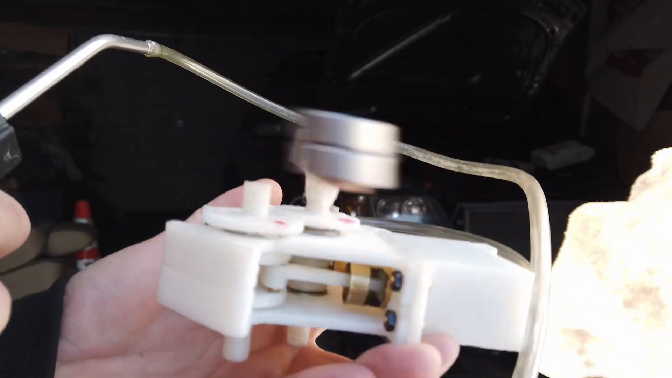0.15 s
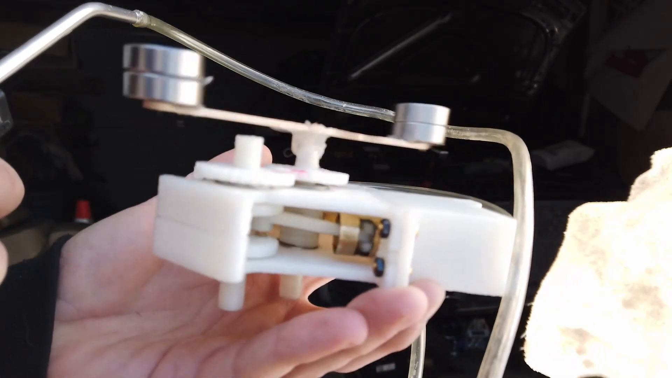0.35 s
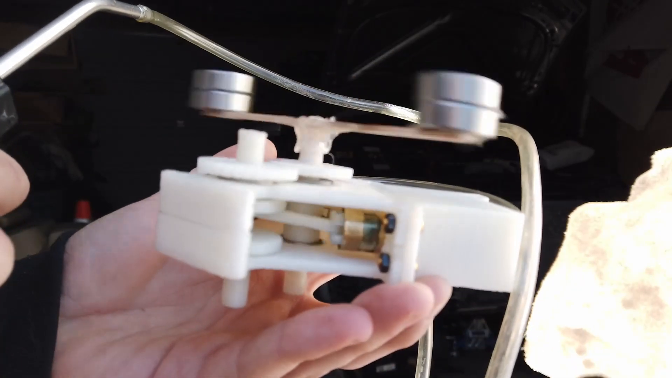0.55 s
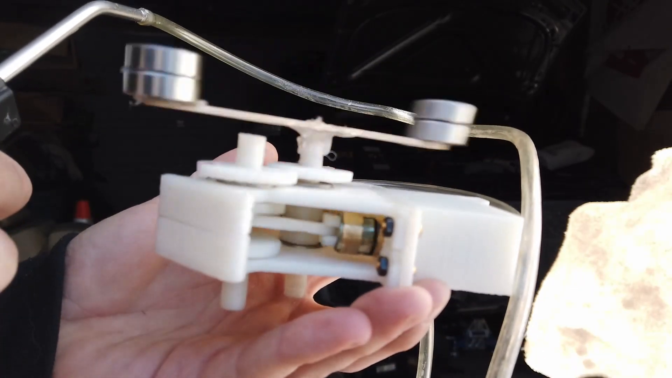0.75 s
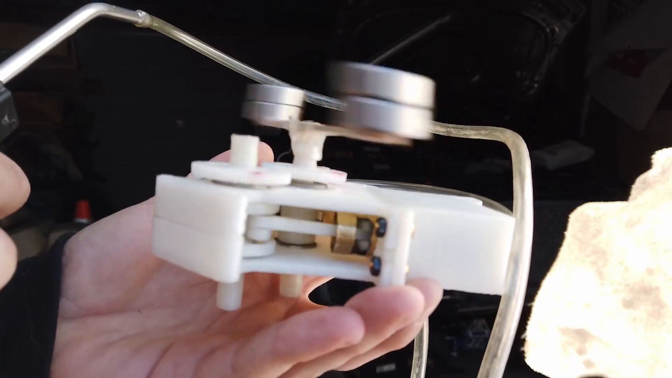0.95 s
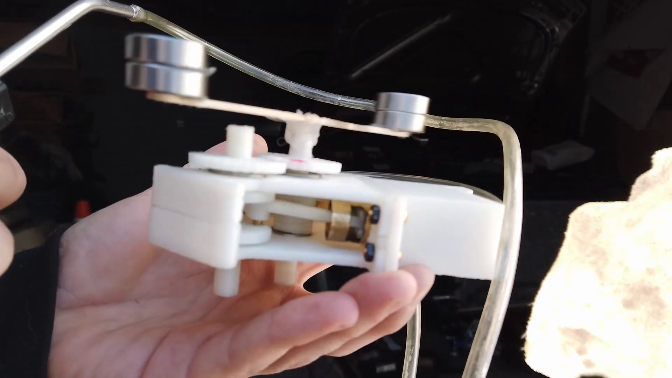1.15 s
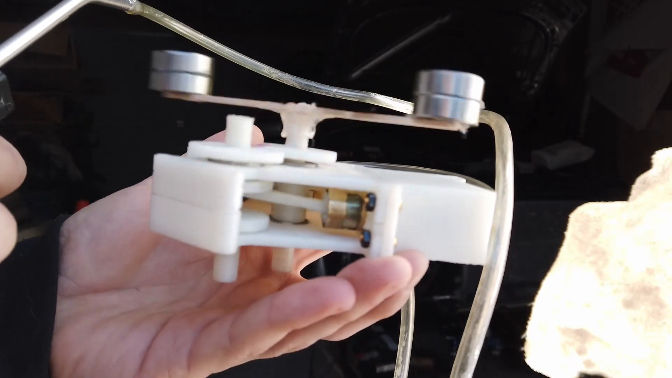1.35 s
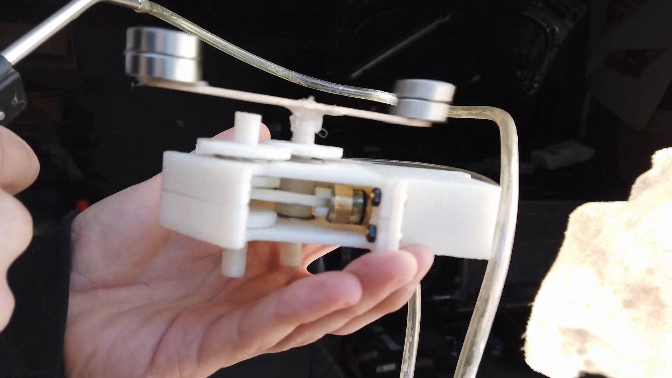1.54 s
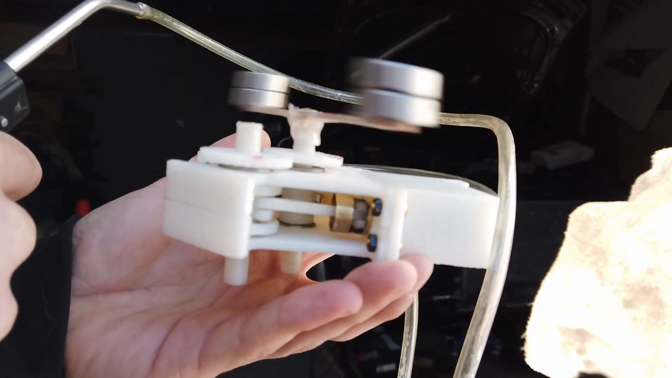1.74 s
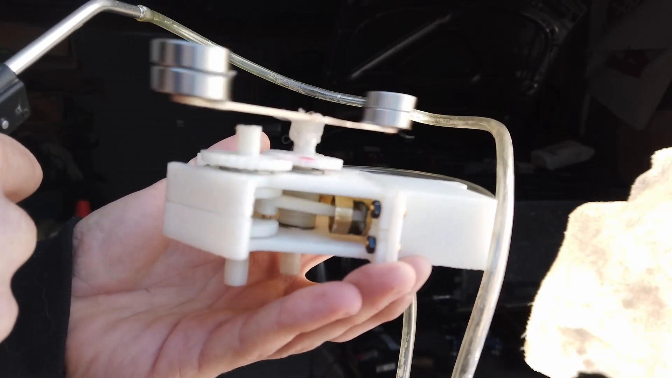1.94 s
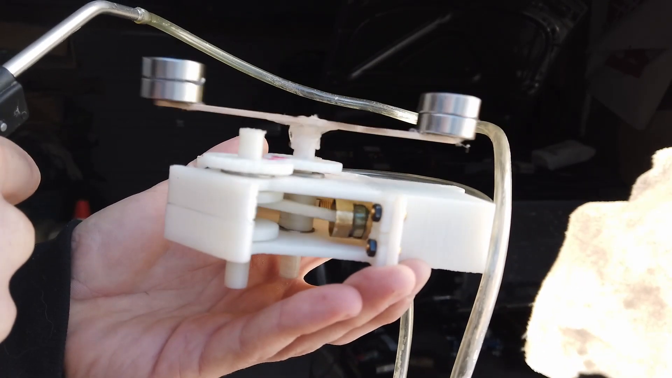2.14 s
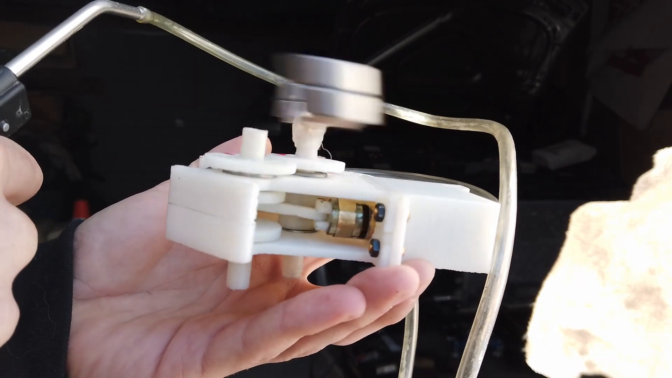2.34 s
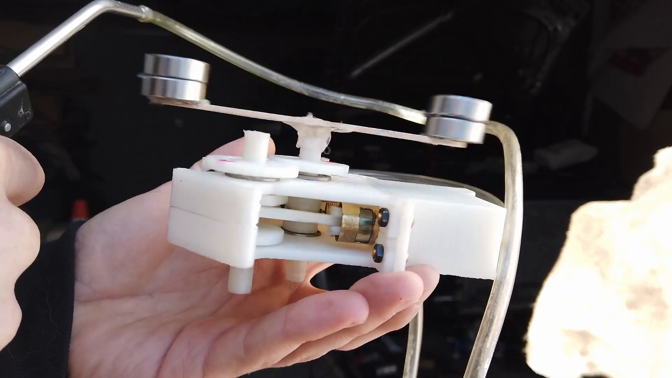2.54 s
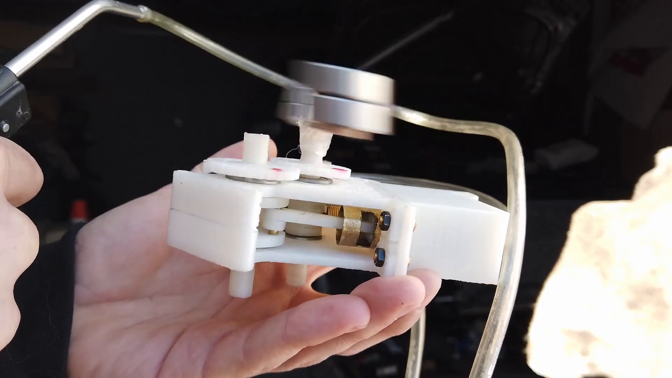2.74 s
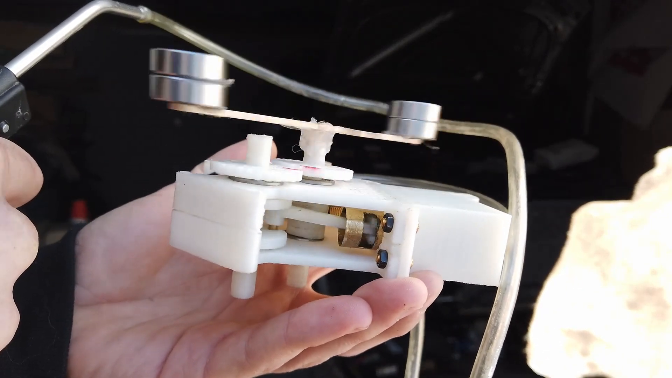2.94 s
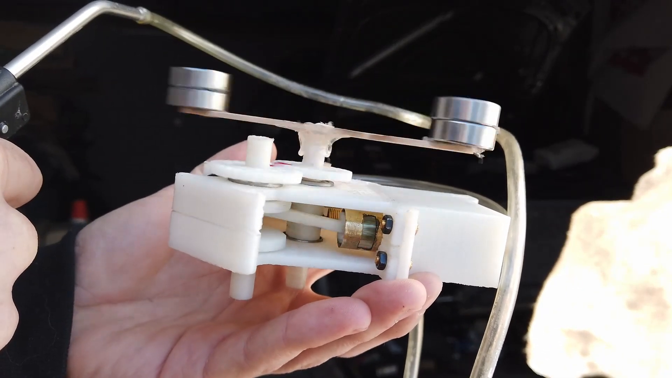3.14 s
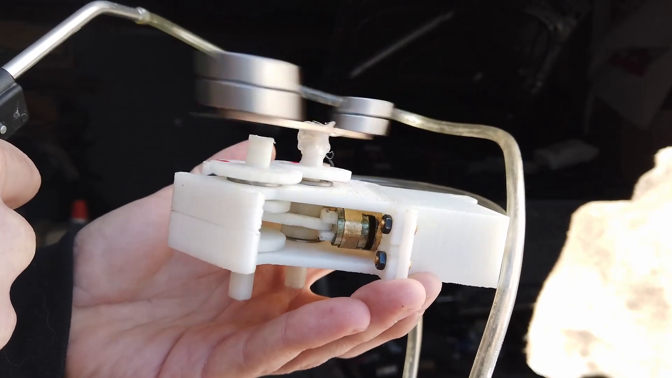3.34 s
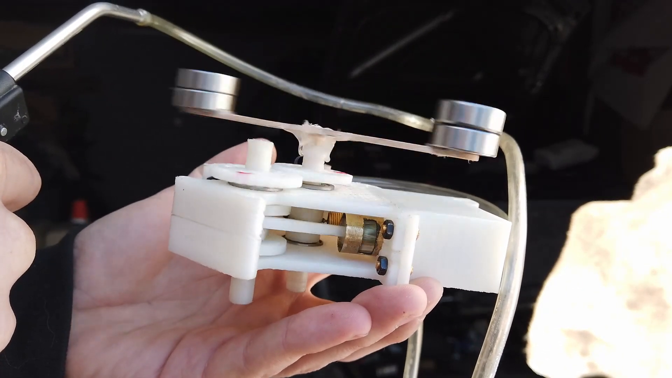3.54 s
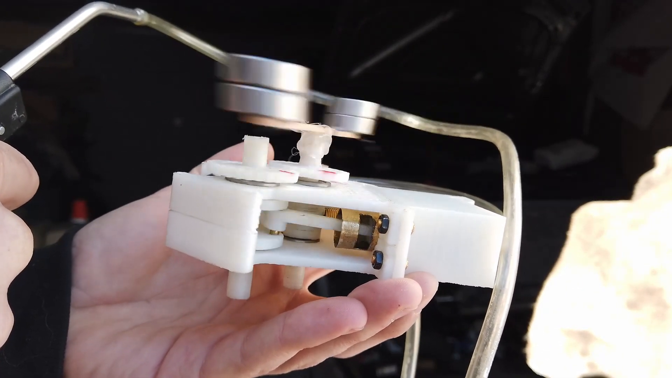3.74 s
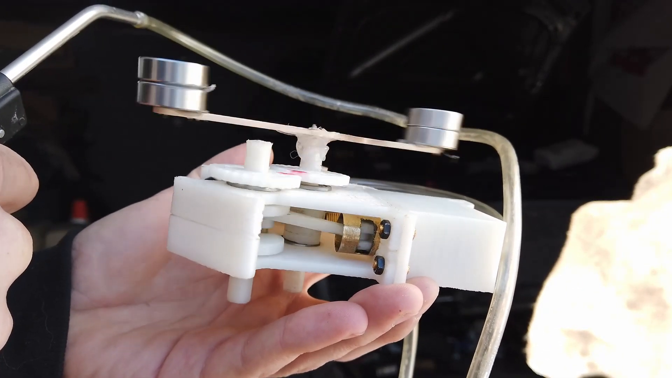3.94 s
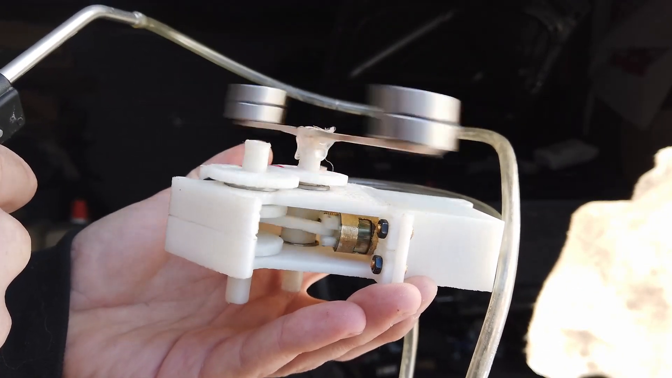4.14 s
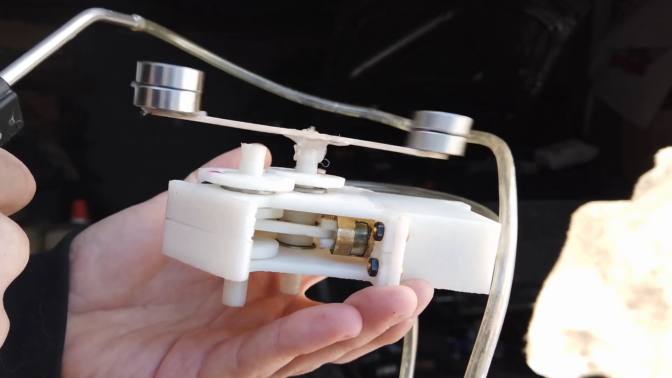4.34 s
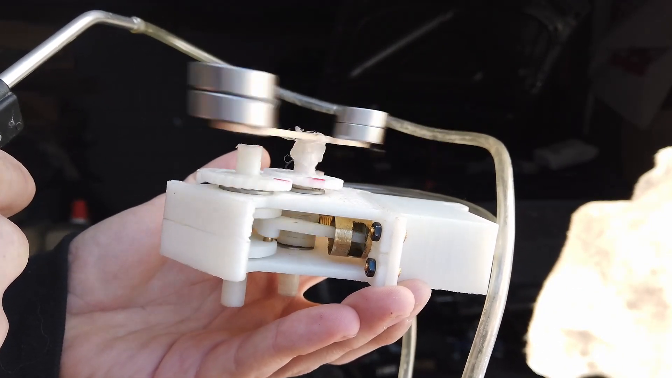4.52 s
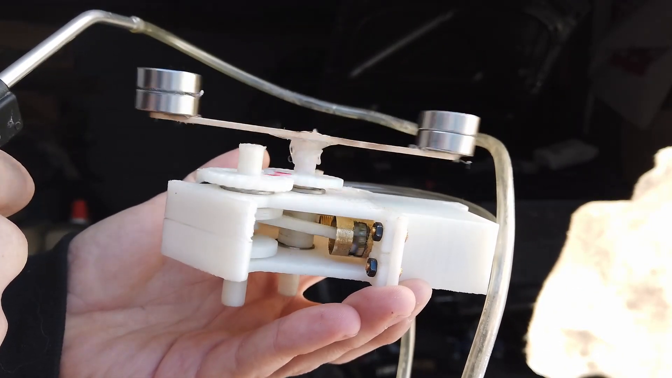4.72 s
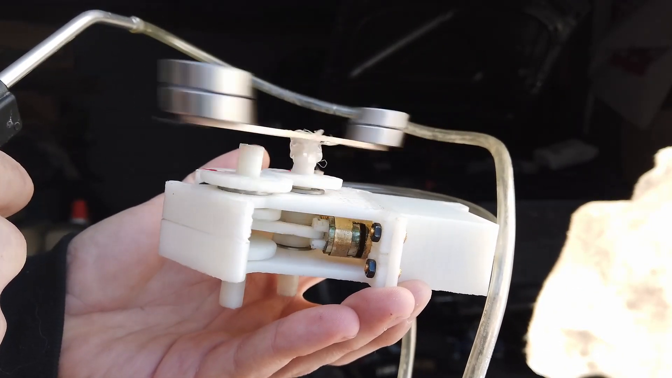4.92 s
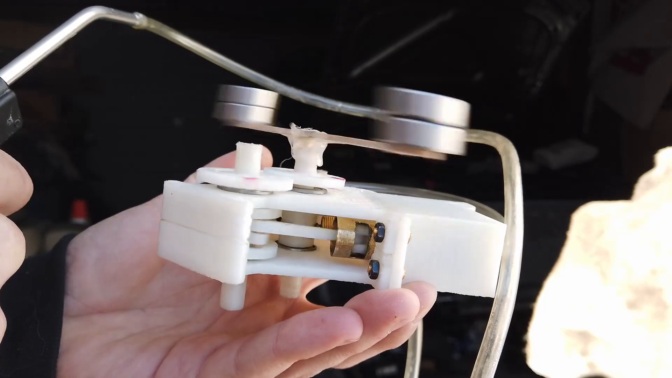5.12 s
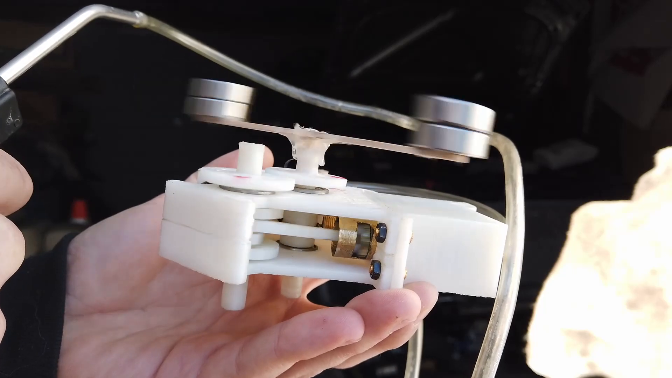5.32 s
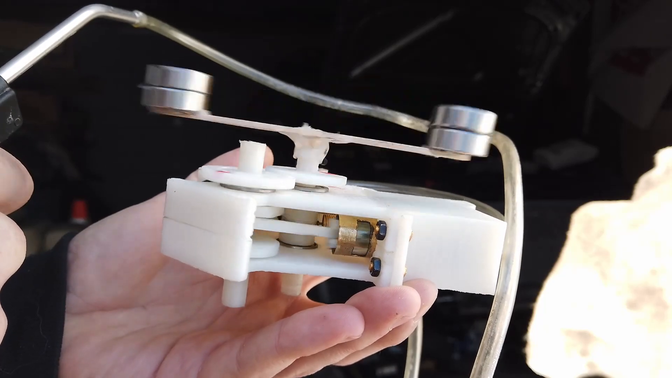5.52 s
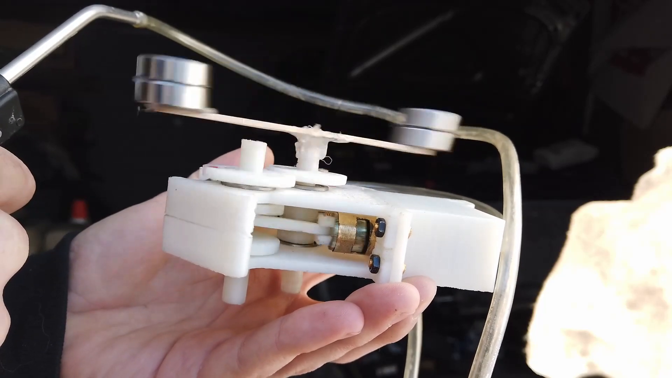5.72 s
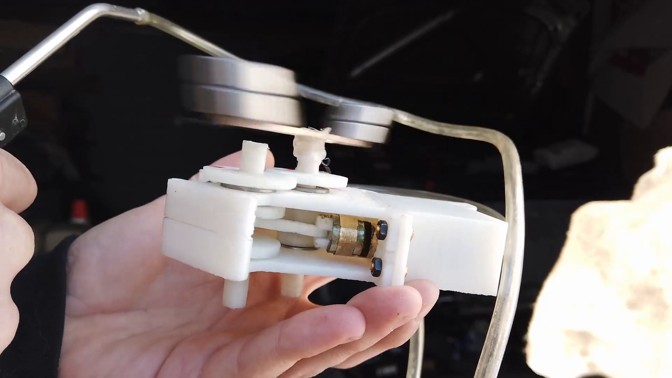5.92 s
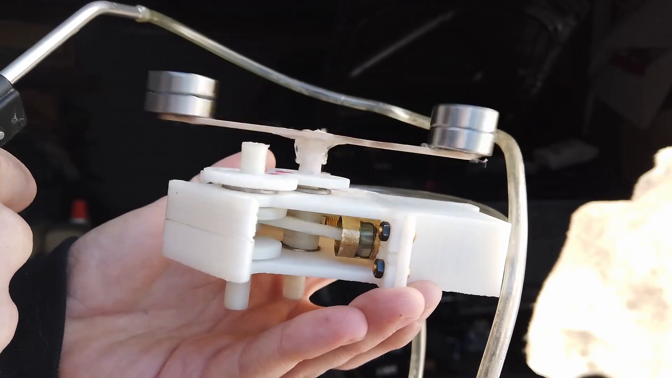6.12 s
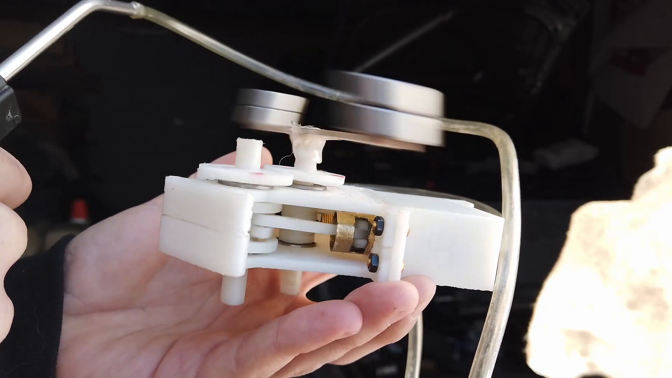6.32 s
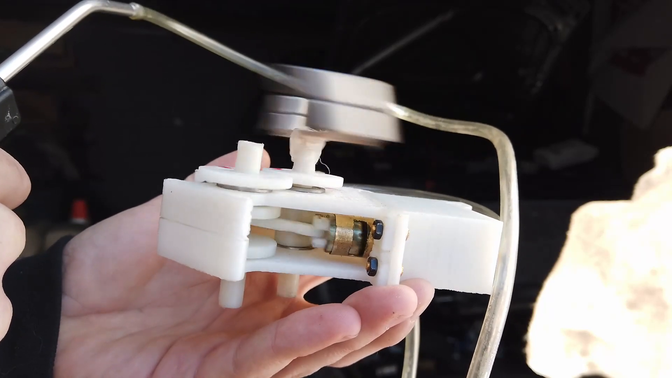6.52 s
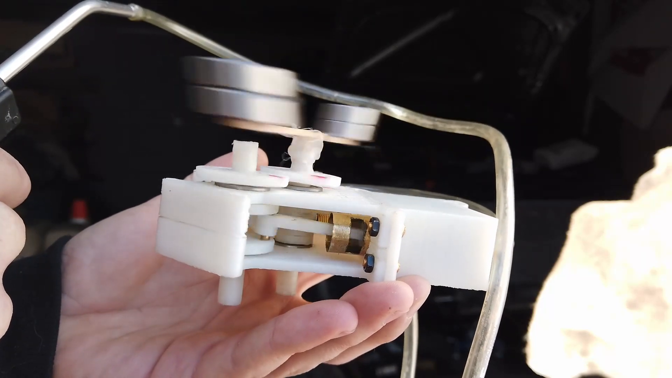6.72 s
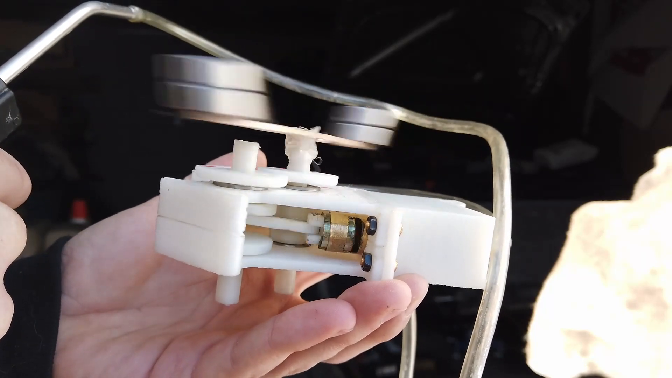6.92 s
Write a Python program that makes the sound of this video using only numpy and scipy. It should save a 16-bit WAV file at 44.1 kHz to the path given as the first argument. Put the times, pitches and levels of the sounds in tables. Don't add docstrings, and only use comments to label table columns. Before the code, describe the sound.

A small plastic air-driven engine chugs close by at about four turns a second, clacking and puffing, then speeds up with harder, hissier blasts.

```python
import sys
import numpy as np
from scipy import signal
from scipy.fft import rfft, irfft, next_fast_len
from scipy.io import wavfile
from scipy.ndimage import uniform_filter1d

SR = 44100
rng = np.random.default_rng(int(sys.argv[2]) if len(sys.argv) > 2 else 0)


def wav_record(signal):
    frames = np.transpose(np.atleast_2d(signal))
    bounded = np.clip(frames, -1, 1)
    quanta = np.round(bounded * 32767).astype(np.int16)
    wavfile.write(sys.argv[1], SR, quanta)


def invert_db(x):
    u = np.asarray(x, float) / 20
    return 10 ** u


N = 307377
time = np.arange(N) / SR
LONG = next_fast_len(N)
BINS_HZ = np.fft.rfftfreq(LONG, 1 / SR)


# time in seconds, opening from 0 to 1.
THROTTLE = [
    (0, 0.04),
    (5.12, 0.0),
    (5.2, 0.35),
    (5.85, 0.46),
    (6.0, 0.83),
    (6.97, 0.83),
]


def throttle(s):
    return np.clip(np.interp(s, *np.transpose(THROTTLE)), 0, 1)


# slap, knock and slam times in seconds, strength in dB.
IDLE_TURNS = [(-0.045, 0.0547, 0.0924, 1), (0.2143, 0.3161, 0.3527, 1.3), (0.4759, 0.5795, 0.6144, 1.2),
              (0.7399, 0.8451, 0.8807, 0.9), (1.003, 1.1055, 1.1405, 0.3), (1.2642, 1.3675, 1.4041, 0.6),
              (1.526, 1.627, 1.6625, -0.1), (1.7839, 1.8844, 1.9195, 0.1), (2.0413, 2.1411, 2.1767, -0.3),
              (2.2955, 2.393, 2.4286, -0.1), (2.5469, 2.6446, 2.6792, -0.9), (2.8002, 2.8987, 2.9337, 0.3),
              (3.0547, 3.1541, 3.1883, 0.4), (3.3103, 3.409, 3.4439, -0.2), (3.5642, 3.6618, 3.697, -0.8),
              (3.8182, 3.9178, 3.9542, 0.1), (4.0758, 4.1756, 4.2151, -0.9), (4.3356, 4.4381, 4.4727, -1.3),
              (4.6035, 4.7137, 4.7497, -1.2), (4.8841, 4.9983, 5.0351, -1.4)]
# slap, knock and slam times in seconds, strength in dB.
FAST_TURNS = [(5.1651, 5.2586, 5.2921, 0.3), (5.3855, 5.4531, 5.4811, 1), (5.5709, 5.6368, 5.6654, -0.3),
              (5.755, 5.8227, 5.8509, -0.3), (5.9425, 6.0118, 6.0341, 0.1), (6.1165, 6.1721, 6.1966, -0.1),
              (6.2714, 6.321, 6.3443, 0.1), (6.4159, 6.4661, 6.486, -0.3), (6.5573, 6.6043, 6.6269, 0.1),
              (6.6965, 6.745, 6.7652, 0.2), (6.8343, 6.8808, 6.9033, -0.2)]
NEXT_SLAP_S = 6.973
# level in dB with the air shut, level in dB wide open.
STROKE_DB = [
    (-0.2, 0.3),
    (-0.1, 0.1),
    (0.9, 7.0),
    (0.7, 1.8),
    (1.4, 3.3),
]


def strokes():
    slap, knock, slam, turn_db = np.transpose(IDLE_TURNS + FAST_TURNS)
    opening = throttle(knock)

    def blend(shut, wide_open):
        return shut + opening * (wide_open - shut)

    puff = knock - blend(31.3, 16.0) / 1000
    blast = slam - blend(8.6, 6.0) / 1000
    follows = [1, 0.4, 1, 0.4, 1]
    force_db = [blend(*pair) + share * turn_db for pair, share in zip(STROKE_DB, follows)]
    return np.transpose([slap, puff, knock, blast, slam]), np.transpose(force_db)


def unit(x):
    return x / np.sqrt(np.mean(x ** 2))


def shape(points):
    hz, db = np.transpose(points)
    return invert_db(np.interp(np.log(BINS_HZ + 1), np.log(hz), db))


def resonance(hz, width_hz, db):
    return invert_db(db) / (1 + (2 * (BINS_HZ - hz) / width_hz) ** 2) ** 1.3


def flicker(rate):
    hold = int(SR / rate)
    levels = rng.standard_normal(N // hold + 1)
    return uniform_filter1d(np.repeat(levels, hold), hold)[:N]


def train(s, size, pulse):
    spikes = np.zeros(N)
    heard = (s >= 0) & (s < time[-1])
    np.add.at(spikes, (s[heard] * SR).round().astype(int), size[heard])
    return signal.fftconvolve(spikes, pulse)[:N]


# frequency in Hz, side minus middle in dB.
SPREAD = [(25, 3), (70, -10), (150, -36), (1000, -26), (3000, -12), (7000, -6), (11000, -4), (15000, -2)]
# frequency in Hz, phase turn
LEAD = [(0, 0), (3190, 0.1), (3620, 0.3), (4910, 0.0), (5600, 1.0), (6290, 0.2), (6800, 1.4), (7240, 0.7),
        (8870, 0.3), (10100, 0.6), (11100, 2.7), (11500, 2.3), (14000, 0.9), (15300, 0.8)]


def noise(gain):
    mid, side = rfft(rng.standard_normal((2, LONG))) * gain
    side = side * shape(SPREAD)
    turn = np.exp(.36j * np.interp(BINS_HZ, *np.transpose(LEAD)))
    return unit(irfft(np.array([mid * turn + side, mid / turn - side]), LONG)[:, :N])


# frequency in Hz, time to fade by 60 dB in ms,
# then the signed share struck by slap, by knock and by slam.
BOX_MODES = [(317, 46, -.01, -.085, -.41), (440, 22, 0, -.02, -.13), (640, 11, -.1, -.02, -.17),
             (1017, 35, .05, -.02, .55), (1353, 14, -.08, .02, -2.37), (1404, 17, .14, .02, .99),
             (1571, 6, -1.3, -.48, 1.52), (1836, 10, .88, .33, -.61), (2662, 25, .1, .04, .09)]
# ms after the blow starts, signed strength.
REBOUNDS = [
    [(1.13, 1.0), (1.8, -0.19), (3.54, 0.73)],
    [(0.94, 1.0), (2.26, 3.12), (2.64, -3.34)],
    [(0.8, 1.0), (2.78, 0.42), (2.92, -0.5)],
]


def blows():
    t = time[:SR // 5]
    hz, t60_ms, *shares = np.transpose(BOX_MODES)
    decay = np.exp(-np.log(1000) * 1000 * t / t60_ms[:, None])
    rings = decay * np.sin(2 * np.pi * hz[:, None] * t)
    contact = np.hanning(14) / 6.5
    hefts = (0.0, 0.7, -0.1)
    times, force_db = strokes()
    out = 0
    for column, share, rebounds, heft in zip((0, 2, 4), shares, REBOUNDS, hefts):
        s, size = times[:, column], invert_db(force_db[:, column])
        ring = share @ rings
        stray = (share * rng.standard_normal(len(hz))) @ rings
        scatter = .07 * rng.standard_normal(len(s))
        deep = (share * (hz < 1100)) @ rings
        deep_size = size * heft * np.sqrt(throttle(s))
        for ms, strength in rebounds:
            hit = s + ms / 1000
            blow = train(hit, size, ring) + train(hit, size * scatter, stray) + train(hit, deep_size, deep)
            out = out + strength * blow
    return np.convolve(out, contact)[:N]


# frequency in Hz, level in dB.
CRACK = [(400, -11), (900, -23), (2000, 7.5), (5000, -5.5), (7000, 1.5), (8500, -0.5), (10200, 7),
         (12000, -5.5), (15600, -12), (15900, -60)]


def cracks():
    t = time[:SR // 20]
    s, force_db = strokes()
    slap_fade = np.exp(-(t / 0.0037) ** 2) + .06 * np.exp(-t / 0.01)
    slap = train(s[:, 0] + .0013, invert_db(force_db[:, 0] - 8.0), slap_fade)
    knock = train(s[:, 2] + 0.0029, invert_db(force_db[:, 2] - 25), np.exp(-(t / 0.0022) ** 2))
    slam = train(s[:, 4] + .002, invert_db(force_db[:, 4] - 10.5), np.exp(-t / 0.0012))
    return (slap + knock + slam) * noise(shape(CRACK))


# fully open from stage, until stage, attack in dB per stage, release in dB per stage.
PORTS = [
    (0.09, 0.14, 300, 30),
    (0.68, 0.8, 110, 70),
    (0.85, 1.06, 150, 60),
    (0.95, 1.82, 70, 22),
    (1.99, 2.06, 120, 30),
    (1.93, 2.92, 110, 30),
    (2.65, 3.0, 14, 45),
    (3.1, 3.72, 40, 45),
    (4.14, 5.0, 75, 130),
    (4.55, 4.98, 26, 210),
]
# valve buzz, hiss and jet, all in dB.
PORT_IDLE_DB = [(-36, -44, -42), (-37, -58, -56), (-35, -32, -27), (-37, -40, -33), (-33, -23, -19),
                (-21, -33, -34), (-30, -45, -45), (-34, -42, -32), (-21, -29, -23), (-30, -20, -13)]
# valve buzz, hiss and jet, all in dB.
PORT_FULL_DB = [(-27, -35, -32), (-25, -45, -46), (-29, -25, -24), (-24, -30, -28), (-28, -19, -11),
                (-17, -19, -21), (-6, -19, -30), (-22, -29, -23), (-16, -18, -11), (-26, -18, -9)]
# valve buzz, hiss and jet, all in dB.
LEAK_DB = [
    (-53, -57, -62),
    (-33, -44, -46),
]


def ports(stage, opening):
    def blend(idle, full):
        return np.outer(idle, 1 - opening) + np.outer(full, opening)

    power = invert_db(2 * blend(*LEAK_DB))
    for (start, end, attack, release), idle, full in zip(PORTS, PORT_IDLE_DB, PORT_FULL_DB):
        half = abs(end - start) / 2
        off = (stage - start - half + 2.5) % 5 - 2.5
        gate_db = -attack * np.maximum(-off - half, 0) - release * np.maximum(off - half, 0)
        power = power + invert_db(2 * (blend(idle, full) + gate_db))
    return 10 * np.log10(power)


# frequency in Hz, width in Hz, level in dB.
VALVE_BUZZ = [(1303, 500, -5.5), (1510, 180, -9), (1768, 480, -2), (1916, 900, -5)]
# frequency in Hz, level in dB.
HISS = [(40, -25), (150, -17), (300, -13), (450, -7.5), (650, -0.5), (880, -20), (1300, 0), (2500, -3.5),
        (3400, 1), (5000, 0), (6500, -1), (7300, -8), (9000, -35)]
# frequency in Hz, level in dB.
JET = [(5000, -86), (6800, -10.5), (8000, -3.5), (9200, -7), (9900, -4), (10100, 2), (10300, 3),
       (10900, -4), (11800, -8), (12600, -23), (14000, -50)]
# frequency in Hz, level in dB.
FIZZ = [(10500, -40), (11800, 1), (12500, -5), (14000, -6.5), (15600, -8.5), (15800, -60)]


def air():
    s, force_db = strokes()
    marks = np.append(s, NEXT_SLAP_S)
    stage = (np.interp(time, marks, np.arange(len(marks))) + 1) % 5
    opening = throttle(time)
    stroke_db = np.interp(time, marks[:-1], force_db[:, [1, 1, 1, 3, 3]].ravel())
    buzz_db, hiss_db, jet_db = ports(stage, opening) + stroke_db

    chamber = sum(resonance(*peak) for peak in VALVE_BUZZ)
    chatter_db = 3.0 * flicker(250) - 2.5 + 6.3 * opening * (1 - opening)
    buzz = noise(chamber) * invert_db(buzz_db + chatter_db)

    sputter_db = buzz_db - 6.5 - 7.0 * np.abs(stage - 2.2) + 1.7 * flicker(400)
    sputter = noise(resonance(2120, 1100, 0)) * invert_db(sputter_db)

    gusts_db = 2.2 * flicker(300)
    hiss = noise(shape(HISS)) * invert_db(hiss_db + gusts_db + 1.32 * flicker(40))
    jet = noise(shape(JET)) * invert_db(jet_db + gusts_db + 2.3 * flicker(40))

    ceiling_db = -17 + 2.9 * opening + 0.26 * (jet_db + 12)
    fizz_db = np.minimum(jet_db, ceiling_db) - 4.5 + 1.5 * flicker(71)
    fizz = noise(shape(FIZZ)) * invert_db(fizz_db)
    return buzz + sputter + hiss + jet + fizz


# ms from the stroke, pressure.
PUFF_SWING = [(-10, 0), (-6, .045), (-3, -.02), (-1, -.04), (3.2, -.08), (3.9, .1), (6, 0), (10, .022),
              (20, 0)]
# ms from the stroke, pressure.
BLAST_SWING = [(-6, 0), (-2.5, .02), (0, .17), (1.5, 0), (3, -.15), (5, -.02), (9, -.03), (14, 0)]
# ms from the stroke, pressure.
SLAP_SWING = [(.2, 0), (.5, .1), (.9, .1), (1.5, -.12), (2.1, .02), (2.6, 0)]
# time in seconds, frequency in Hz, level in dB.
THUMPS = [
    (3.861, 30, -23),
    (1.495, 27, -28),
    (4.585, 32, -32),
]


def surges():
    s = strokes()[0]
    opening = throttle(s[:, 0])
    out = 0
    for column, swing, full_db in ((1, PUFF_SWING, 7), (3, BLAST_SWING, 7.5), (0, SLAP_SWING, -1)):
        for share, db, stretch in ((1 - opening, 0, 1), (opening, full_db, .8)):
            ms, pressure = np.transpose(swing) * [[stretch], [1]]
            pulse = np.interp(np.arange(ms[0], ms[-1], 1000 / SR), ms, pressure)
            pulse = uniform_filter1d(pulse, size=20)
            out = out + train(s[:, column] + ms[0] / 1000, share * invert_db(db), pulse)
    for at, hz, db in THUMPS:
        swell = np.exp(-((time - at) / .024) ** 2)
        out = out - invert_db(db) * np.sin(2 * np.pi * hz * (time - at)) * swell
    return out


# ms before the slap, level in dB idling, level in dB wide open.
TEETH = [
    (48, -31, -44),
    (36, -27, -9),
    (23, -31, -14),
    (10, -30, -40),
]


def gear():
    t = time[:SR // 50]
    slap = np.append(strokes()[0][:, 0], NEXT_SLAP_S)[:, None]
    ms, idle_db, full_db = np.transpose(TEETH)
    load = throttle(slap) ** 2
    chance = rng.standard_normal((len(slap), len(ms), 2))
    ahead_ms = ms * (1 - 0.38 * load) + 0.9 * chance[..., 0]
    s = slap - ahead_ms / 1000
    db = idle_db + load * (full_db - idle_db) + 3.5 * (1 - load) * chance[..., 1]
    tick = np.sin(2 * np.pi * 1700 * t) * (t / 0.00062) * np.exp(1 - t / 0.00058)
    return train(s.ravel(), invert_db(db.ravel() + 5.0), tick)


# frequency in Hz, width in Hz, level in dB.
PANELS = [(309, 95, 1.5), (1047, 190, -4.5), (1366, 140, -5)]


def murmur():
    t = time[:SR // 5]
    fade = (1 - np.exp(-(t / 0.02) ** 2)) * np.exp(-t / .03)
    s, force_db = strokes()
    level = train(s[:, -1], invert_db(force_db[:, -1] - 27), fade)
    return level * noise(sum(resonance(*peak) for peak in PANELS))


# frequency in Hz, level in dB.
WIND = [(12, -33), (20, 4), (65, 7.5), (146, -1), (326, -7), (852, -13), (1060, -15.5), (1200, -4),
        (1560, -49), (2640, -120)]
# time in seconds, level in dB.
WIND_DB = [(0.0, -47), (1.5, -43), (3.2, -45), (3.8, -43), (4.7, -46), (6.0, -44), (6.97, -37)]


def wind():
    level_db = np.interp(time, *np.transpose(WIND_DB)) + 3.6 * flicker(12) + 3.5
    return noise(shape(WIND)) * invert_db(level_db)


def scene():
    solid = rfft(blows() + gear() + surges(), LONG)
    lag = 0.99
    turn = np.exp(1j * np.pi * np.fft.rfftfreq(LONG) * lag)
    near = irfft(np.array([solid * turn, solid / turn]), LONG)[:, :N]
    near = near + cracks() + air() + murmur()
    t = time[:SR // 5]
    echo = rng.standard_normal((2, len(t))) * np.exp(-t / 0.075) * (t > .004)
    echo = uniform_filter1d(echo, size=5)
    tail = invert_db(-65) * signal.fftconvolve(near, echo, axes=1)[:, :N]
    return near + tail + wind()


def top_cut(x):
    return signal.sosfilt(signal.butter(12, 15750, fs=SR, output="sos"), x)


def record(dry):
    x = signal.sosfilt(signal.butter(1, 18, "high", fs=SR, output="sos"), dry)
    knee = 4.5
    x = 1.121 * x / (1 + np.abs(x) ** knee) ** (1 / knee)
    x = signal.sosfilt(signal.ellip(8, .2, 60, 15750, fs=SR, output="sos"), x)
    return top_cut(x)


dry = scene()
out = record(dry)
wav_record(out)
```